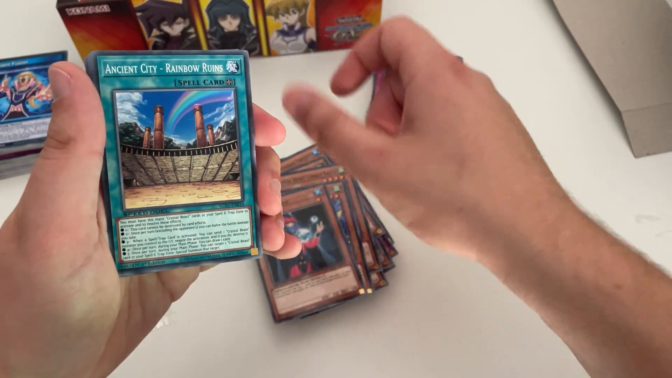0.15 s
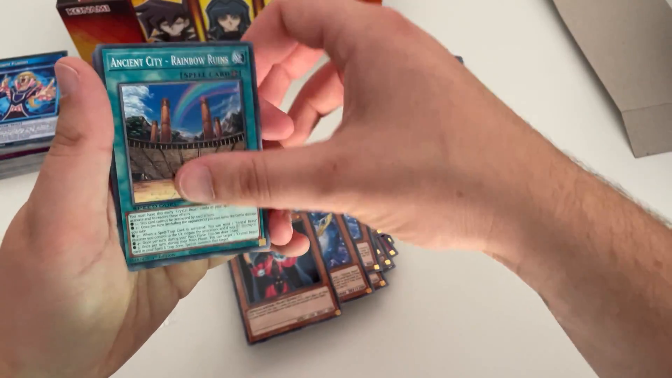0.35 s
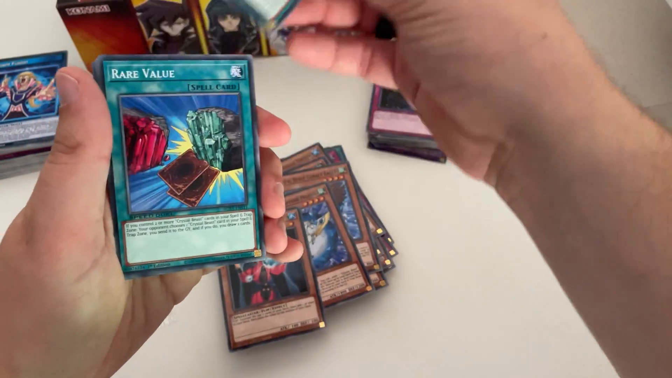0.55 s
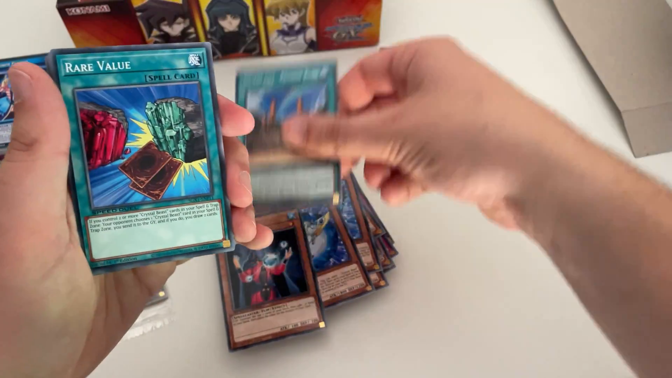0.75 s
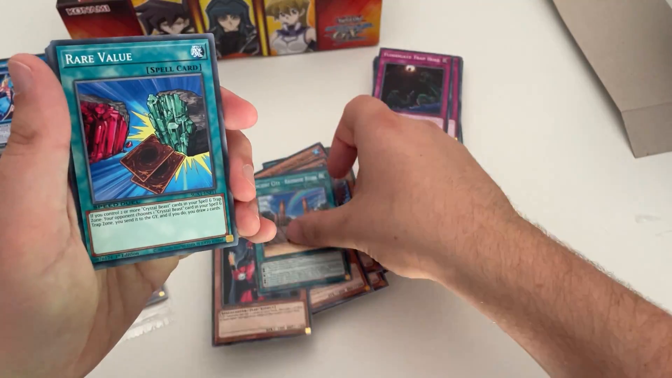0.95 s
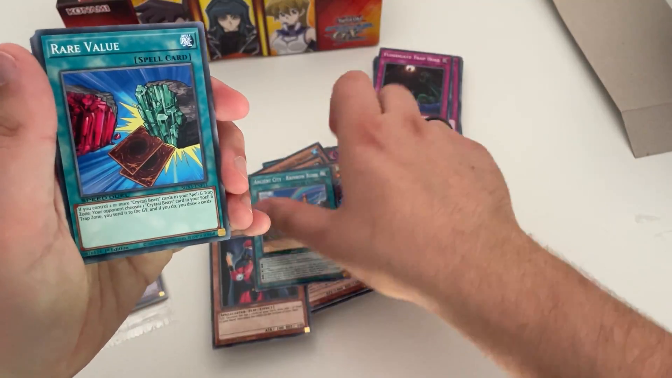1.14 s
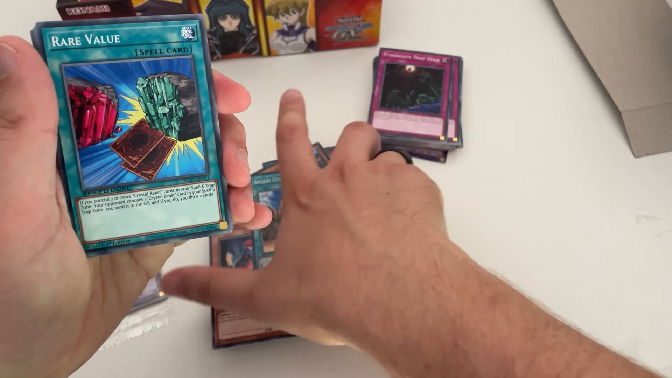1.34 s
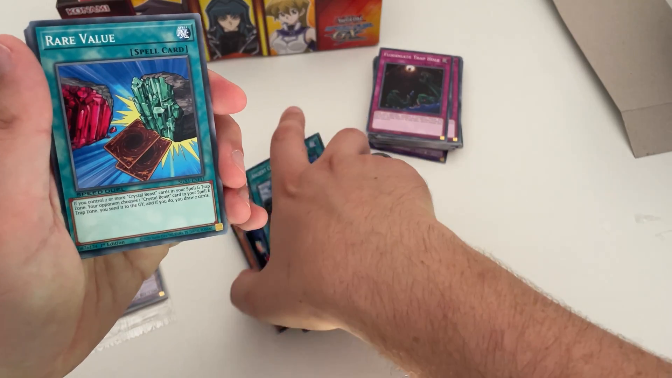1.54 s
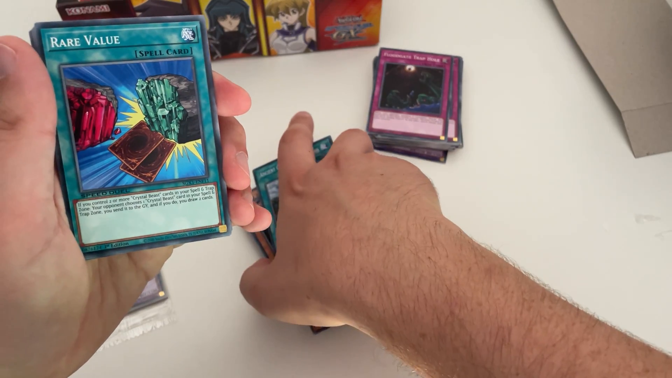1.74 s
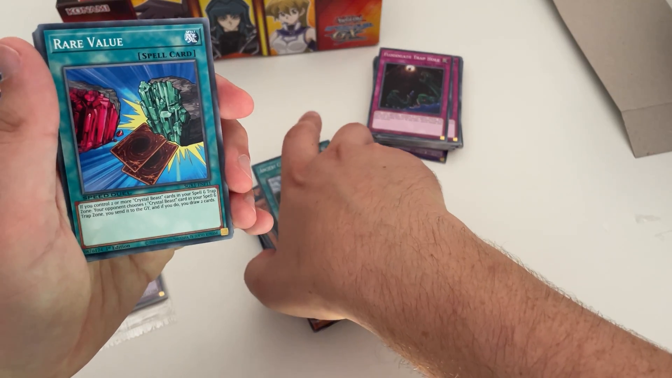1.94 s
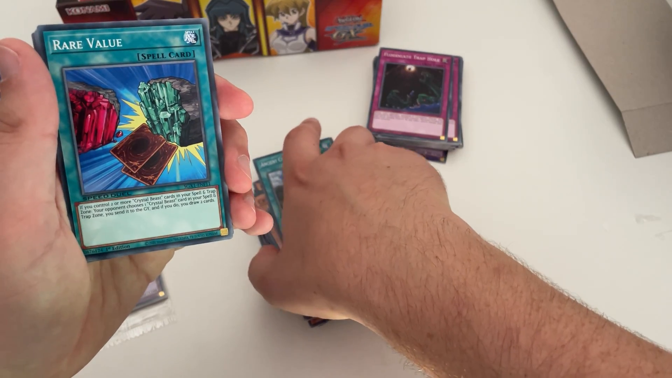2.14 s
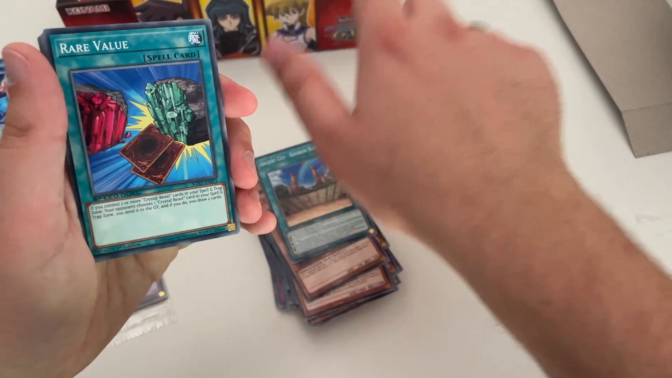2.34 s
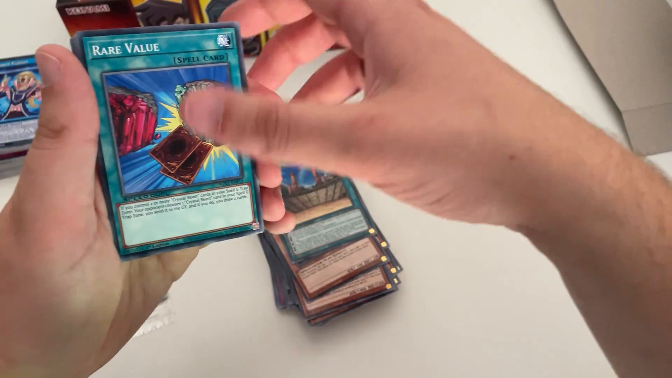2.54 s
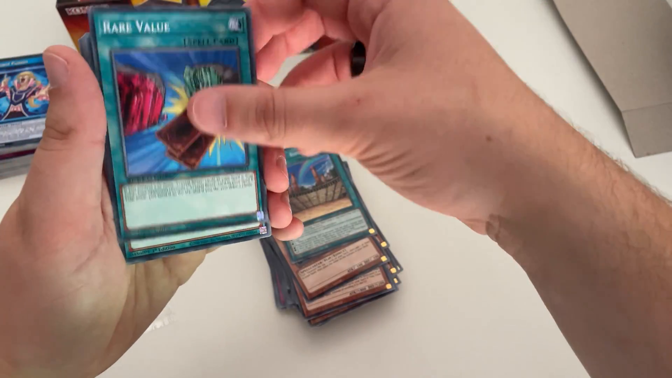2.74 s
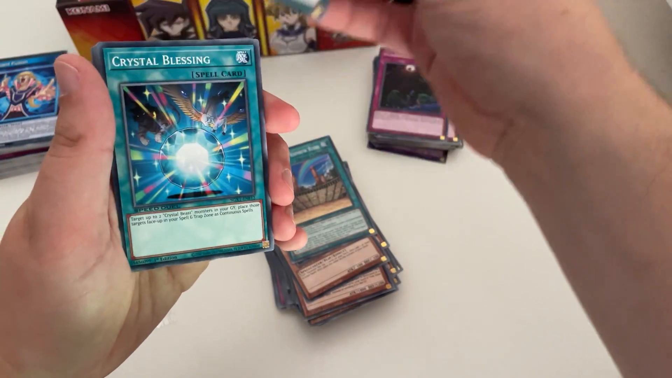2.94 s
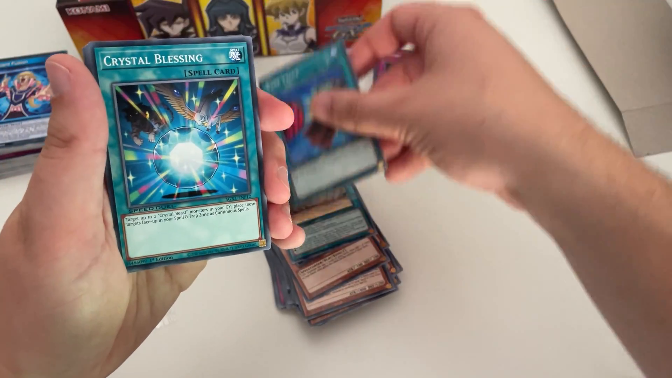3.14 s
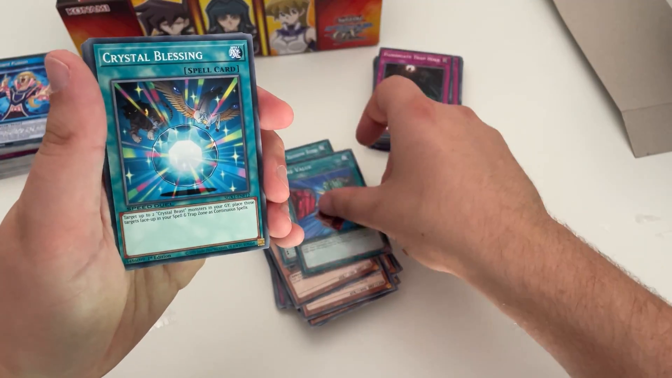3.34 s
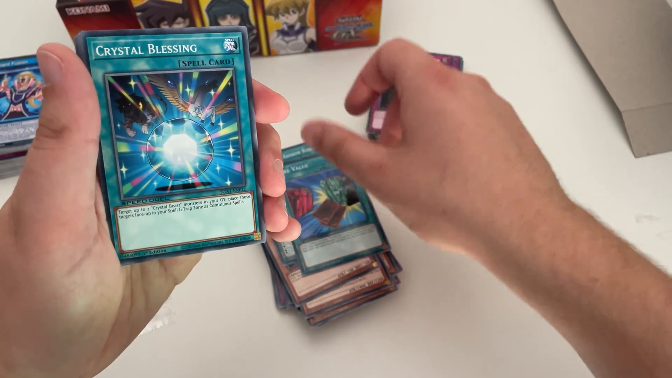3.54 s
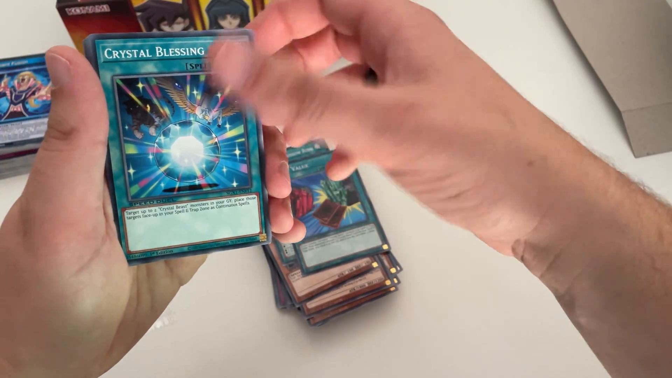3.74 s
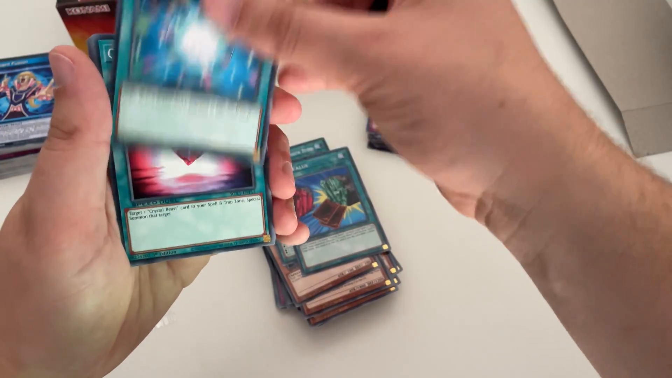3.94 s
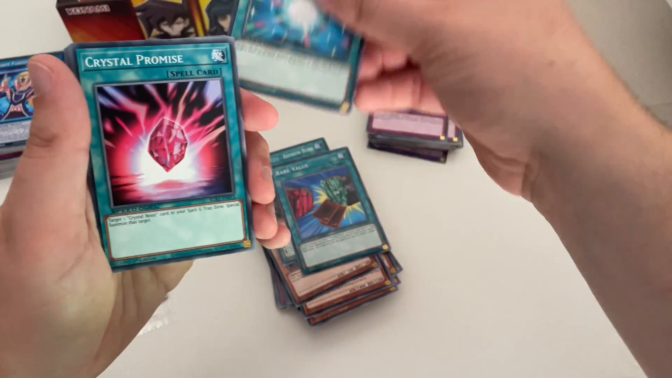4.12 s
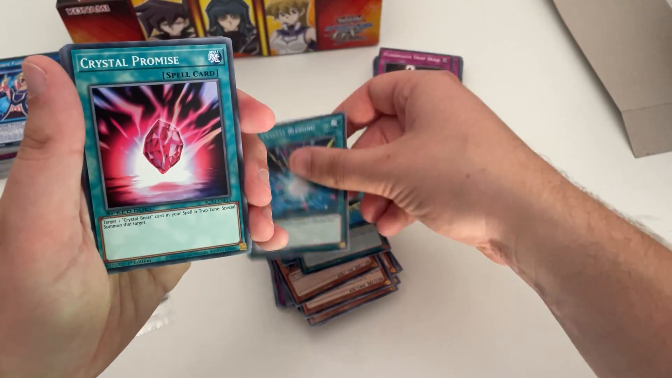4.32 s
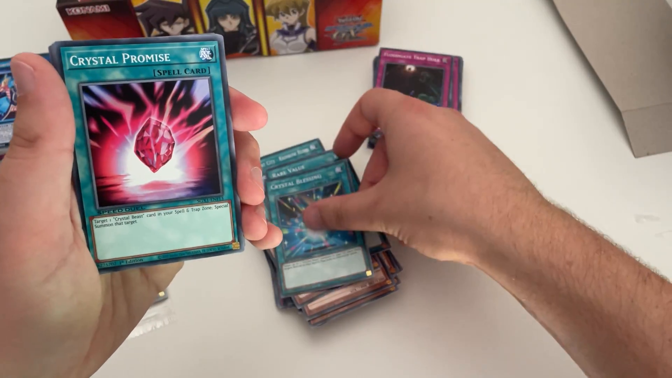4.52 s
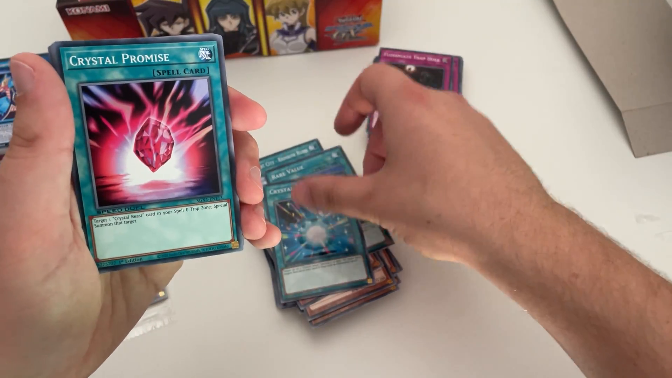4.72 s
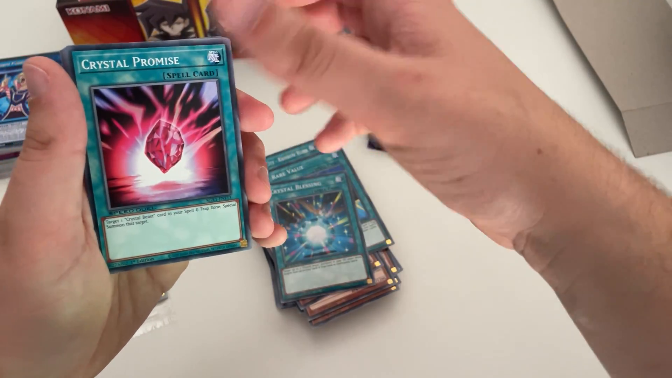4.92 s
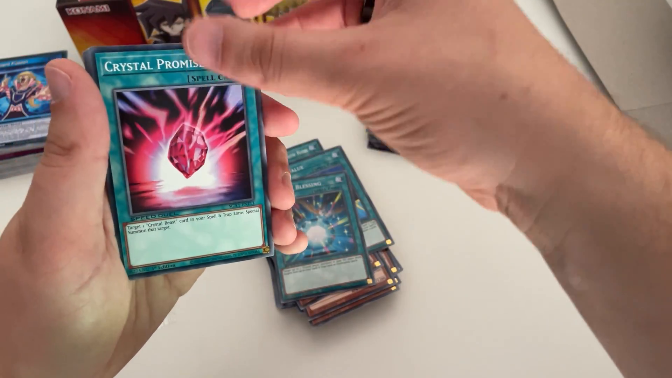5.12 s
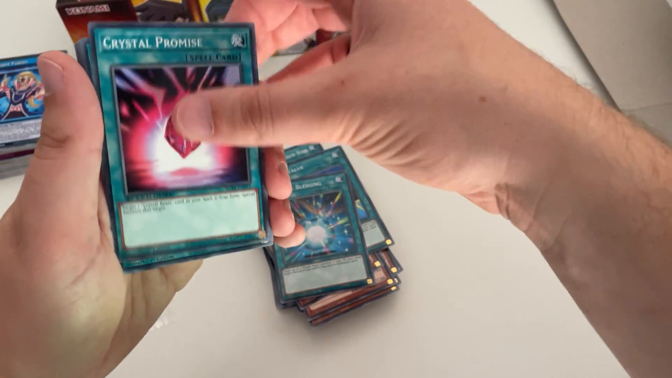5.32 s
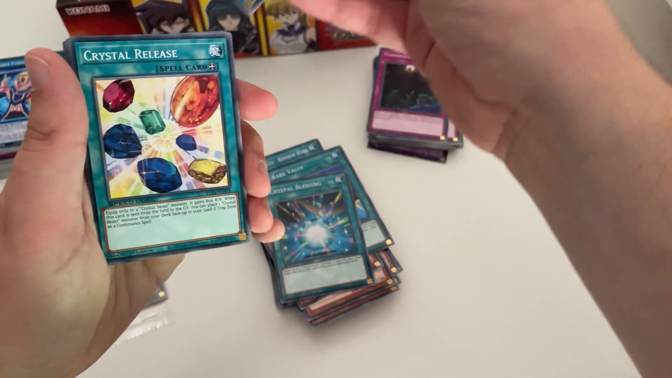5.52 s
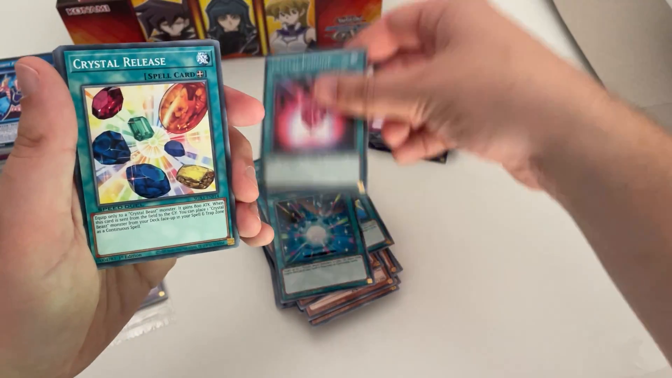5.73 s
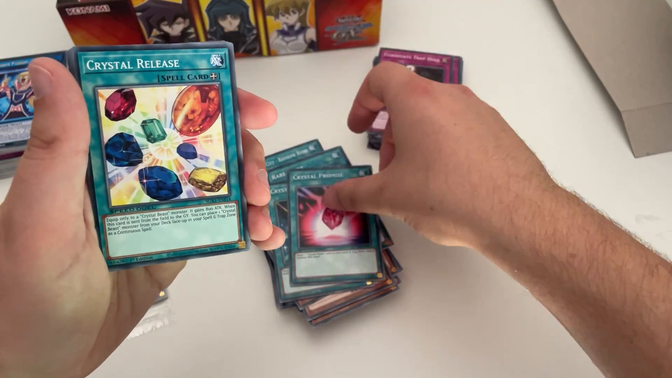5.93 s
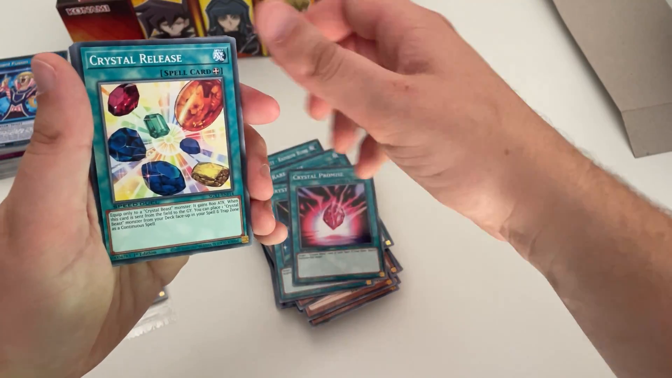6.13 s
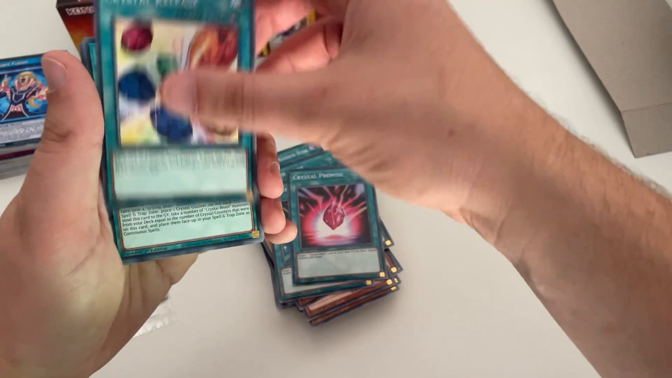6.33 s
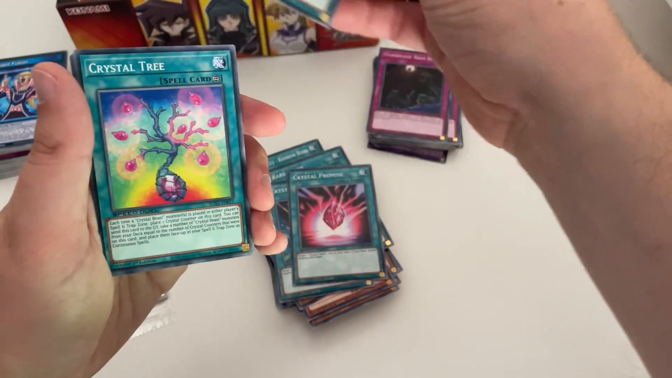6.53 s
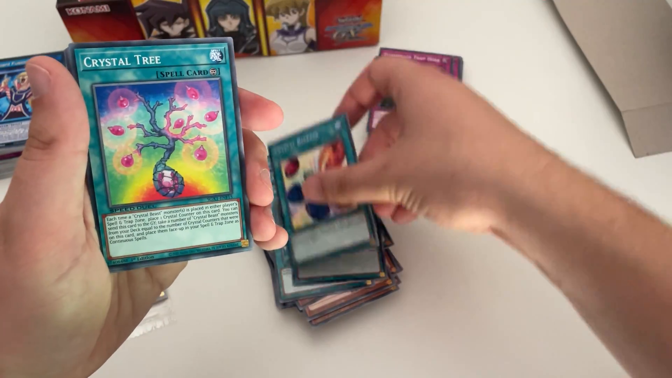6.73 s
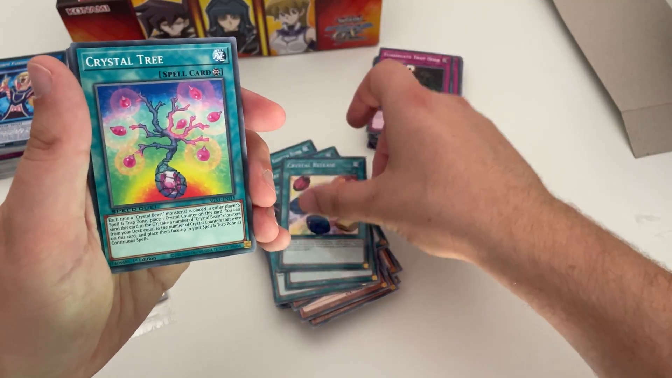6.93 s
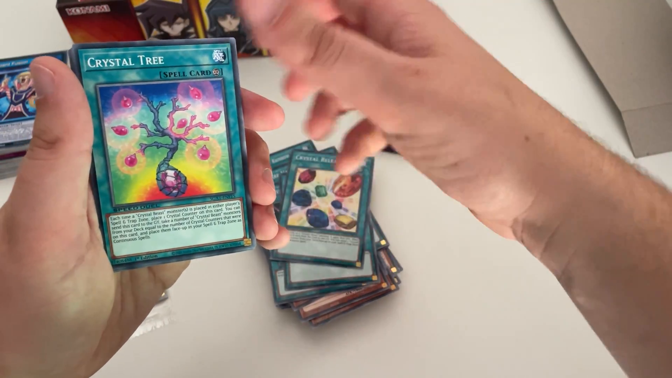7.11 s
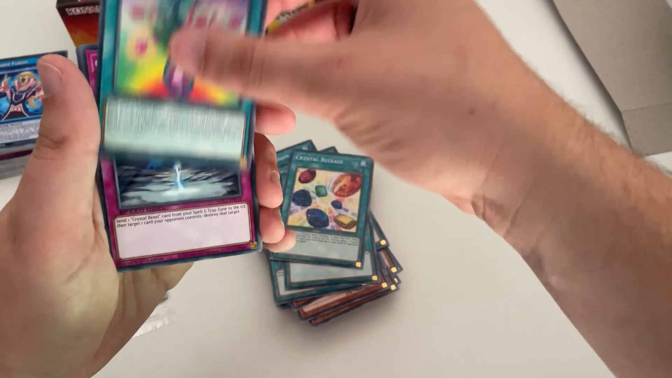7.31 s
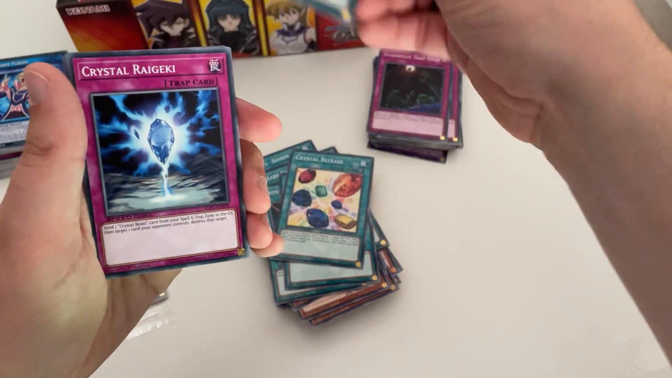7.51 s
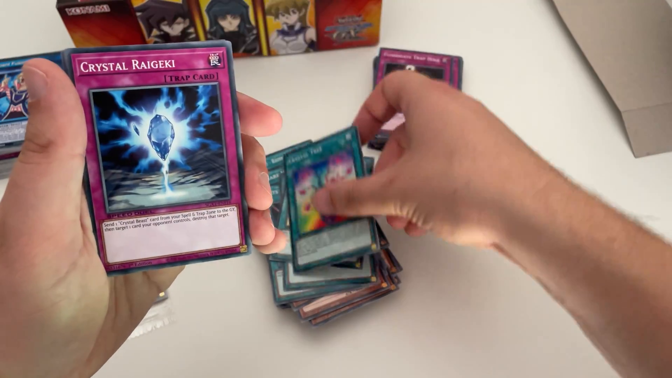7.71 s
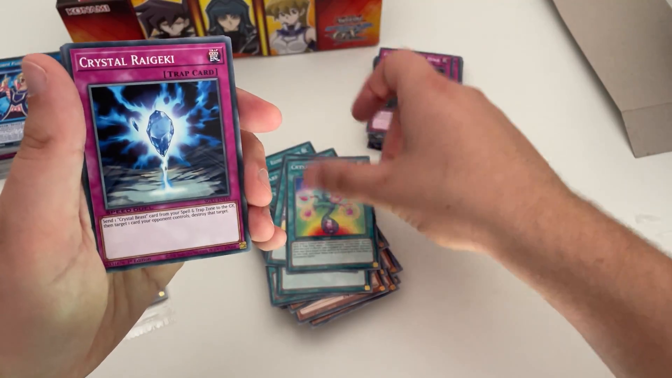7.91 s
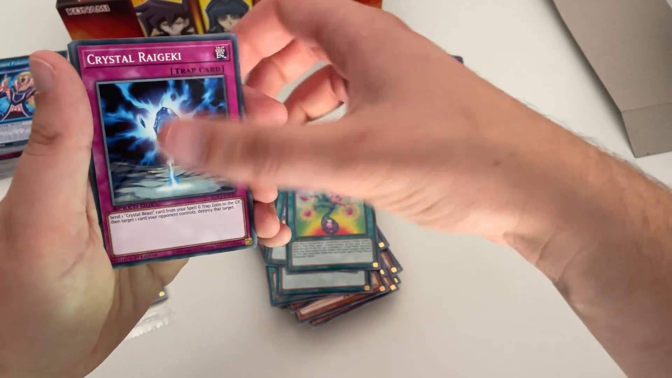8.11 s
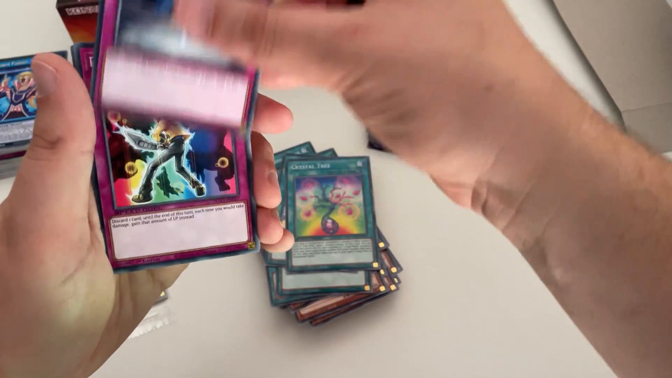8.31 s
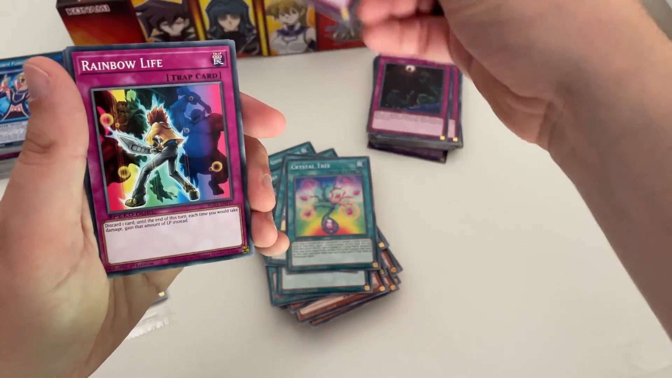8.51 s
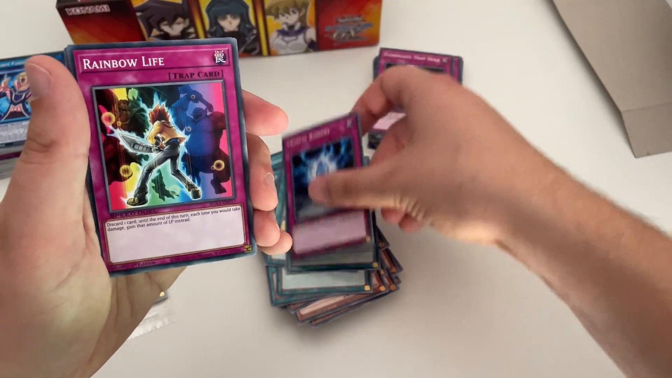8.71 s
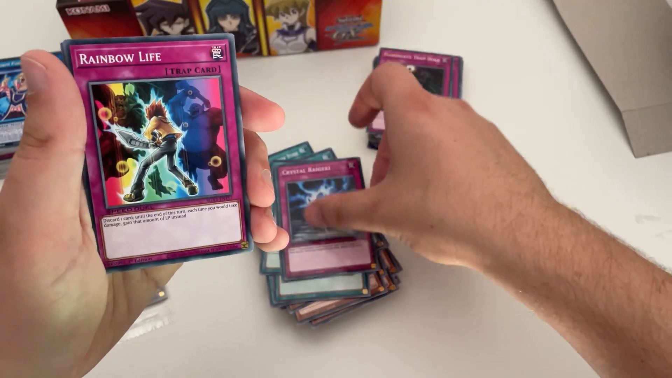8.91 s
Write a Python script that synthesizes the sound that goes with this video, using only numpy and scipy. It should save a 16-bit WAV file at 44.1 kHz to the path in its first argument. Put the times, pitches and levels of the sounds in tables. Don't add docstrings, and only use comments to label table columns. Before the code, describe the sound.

Very close stereo sound of thin coated cards being dealt in a small quiet room. A laid card rustles at the start, with a light tap at 0.36 s. At 0.5 s a card is whisked off the deck with a soft hiss, landing in taps and scuffs around 0.9 s. A quieter stretch follows, with small clicks and a short scrape near 1.5 s as the pile is squared up. Brisk pulls with springy snaps come at about 2.9, 4.0, 5.5, 6.4, 7.4 and 8.4 s, each preceded by a faint thumb grip or creep. Papery landings follow near 3.3, 4.2, 5.9, 6.8, 7.8 and 8.8 s; the one at 4.2 s is clearly the loudest, a sharp scraping slap. Soft low table thumps, faint finger rustles, low hum and street rumble continue underneath, with a distant engine drone faintly rising around 7.5 s.

```python
import sys
import numpy as np
from scipy import signal
from scipy.fft import rfft, irfft, next_fast_len
from scipy.io import wavfile
from scipy.ndimage import uniform_filter1d

SR = 44100
rng = np.random.default_rng(int(sys.argv[2]) if len(sys.argv) > 2 else 0)


def makeup_ratio(level_db):
    decades = np.asarray(level_db, float) / 20
    return 10 ** decades


def put_to_file(sound):
    columns = np.atleast_2d(sound).T
    safe = np.clip(columns, -1, 1)
    whole_steps = np.round(safe * 32767)
    wavfile.write(sys.argv[1], SR, whole_steps.astype(np.int16))


N = 395136

# hz [Hz], level_db [dB]
SHEEN_BANDS = [(6000, -36.5), (8000, 6.5), (10500, 0.5), (13000, -4.5), (16000, -5.5)]
# start_s [s], fastest_s [s], end_s [s], level_db [dB], brightness_db [dB]
PULL_STROKES = [(0.495, 0.544, .571, -45.5, -2), (2.876, 2.92, 2.936, -43.5, -1.5),
                (3.956, 3.981, 4.01, -47.5, 3.5), (5.443, 5.485, 5.497, -43.5, 1.5),
                (6.385, 6.411, 6.476, -46.5, -0.5), (7.389, 7.416, 7.43, -49.5, -4),
                (8.326, 8.345, 8.39, -46.5, -1)]


def unit(x):
    return x / np.sqrt(np.mean(x ** 2) + 1e-20)


def along(points, hz):
    f, v = np.transpose(points)
    return np.interp(np.log(hz + 1), np.log(f + 1), v)


def curves(rows):
    s, *cols = np.transpose(rows)
    return [np.interp(np.arange(N) / SR, s, c) for c in cols]


def wobble(rate):
    knots = rng.standard_normal(int(N * rate / SR) + 2)
    return np.interp(np.arange(N) * rate / SR, np.arange(len(knots)), knots)


def filtered(x, response):
    n = x.shape[-1]
    m = next_fast_len(n + 4096)
    return irfft(rfft(x, m) * response(np.fft.rfftfreq(m, 1 / SR)), m)[..., :n]


def mode(f, hz, width):
    return 1j * f * width / (hz * hz - f * f + 1j * f * width + 1e-9)


def noise(spectrum, grit_db=0):
    grain_db = grit_db * wobble(900) + 1.05 * grit_db * wobble(90)
    grit = makeup_ratio(np.minimum(grain_db, 4.5))
    return unit(filtered(grit * rng.standard_normal(N), lambda hz: makeup_ratio(along(spectrum, hz))))


def patchy(x, depth_db, size=256):
    z = signal.stft(x, nperseg=size)[2]
    field = uniform_filter1d(rng.standard_normal(z.shape), size=5, axis=0)
    field = uniform_filter1d(field, size=6, axis=1)
    return unit(signal.istft(z * makeup_ratio(depth_db * unit(field)), nperseg=size)[1][:N])


def card(f, trim_db=0):
    # hz [Hz], width_hz [Hz], level_db [dB]
    card_modes = [(1300, 1700, -7.5), (2020, 260, -2), (3200, 330, -10.5), (5700, 1600, -7.5)]
    trims = np.broadcast_to(trim_db, len(card_modes))
    total = 0
    for k, (hz, width, db) in enumerate(card_modes):
        total = total + (-1) ** k * makeup_ratio(db + trims[k]) * mode(f, hz, width)
    return total


def deck(f):
    # hz [Hz], width_hz [Hz], level_db [dB]
    deck_modes = [(2050, 350, 4), (3220, 380, 5), (5400, 1100, 4)]
    return 0.55 + sum(makeup_ratio(db - 7) * np.abs(mode(f, hz, width)) ** 2 for hz, width, db in deck_modes)


def strokes(rows, law, catch, slip):
    out = np.zeros((len(law), N))
    over_db, share, start_db, end_db = np.transpose(law)[..., None]
    for start, fastest, end, db, bright_db in rows:
        i = np.arange(max(0, round(start * SR)), min(N, round(end * SR)))
        before = np.clip((fastest - i / SR) / (fastest - start), 0, 1) ** catch
        after = np.clip((i / SR - fastest) / (end - fastest), 0, 1) ** slip
        out[:, i] += makeup_ratio(db + over_db + share * bright_db - start_db * before - end_db * after)
    return uniform_filter1d(out, size=351, axis=1)


def drawing_strokes():
    # start_s [s], fastest_s [s], end_s [s], level_db [dB], brightness_db [dB]
    pushes = [(.395, .49, 0.48, -59, 4), (1.45, 1.49, 1.58, -62, -14.5), (2.735, 2.86, 2.88, -59.5, 0),
              (3.86, 3.945, 4.16, -62.5, 1.5), (5.37, 5.43, 5.445, -60, 1), (6.3, 6.335, 6.39, -63, 7),
              (7.265, 7.31, 7.38, -59.5, 5), (8.215, 8.27, 8.43, -60.5, 2)]
    shoves = [(1.526, 1.575, 1.613, -51, 1.5)]
    # over_level_db [dB], brightness_share, start_drop_db [dB], end_drop_db [dB]
    push_law = [(-2, -0.14, 17, -1.5), (2.5, -0.064, 13, 0.5), (-19, -1.1, 37, -0.5), (-4.5, .8, 10.5, 5)]
    pull_law = [(-6.5, -1.5, 9.1, 2.5), (0.94, -0.6, 11, 10), (-21.5, -3, 6, -8), (-6, 0.26, 9, 18.5)]
    shove_law = [(-7, -.8, 18, 6.3), (-0.5, 0.73, 2, 1.4), (-11.5, -0.65, -5, 11), (-12, .8, 7, 4)]
    gains = strokes(pushes, push_law, catch=2.1, slip=1.2)
    gains = gains + strokes(PULL_STROKES, pull_law, catch=1.3, slip=1.3)
    return gains + strokes(shoves, shove_law, catch=1.2, slip=1.6)


def settling_strokes():
    # start_s [s], fastest_s [s], end_s [s], level_db [dB], brightness_db [dB]
    lies = [(-.02, .002, 0.15, -49.5, 4), (.87, .954, 1.23, -58.5, -3.5), (1.61, 1.63, 1.77, -63, 4),
            (3.3, 3.4, 3.54, -54.5, -2), (4.205, 4.27, 4.47, -46.5, -2.5), (4.42, 4.51, 4.69, -57, 3.5),
            (5.84, 5.95, 6.05, -58.5, 4), (6.77, 6.9, 7.0, -63, -4), (7.73, 7.85, 7.95, -59.5, 0.5),
            (8.745, 8.82, 9.1, -56, 1), (8.89, 8.93, 9.8, -70, -1)]
    fumbles = [(.12, .21, 0.67, -77.5, -6.5), (.575, .6, 0.85, -73, -1), (.75, .8, 1.1, -71, 0.5),
               (1.76, 1.8, 1.88, -69.5, -1), (1.9, 1.98, 2.1, -77, 3), (2.95, 2.975, 3.5, -69, 1),
               (4.02, 4.04, 4.13, -71, -7), (5.55, 5.63, 5.68, -66.5, 2.5), (5.74, 5.77, 5.8, -69.5, -2.5),
               (6.49, 6.52, 6.6, -66.5, 1.5), (6.6, 6.65, 6.72, -75, -5.5), (7.44, 7.46, 7.52, -69.5, 4.5),
               (7.52, 7.57, 7.65, -63.5, -1), (8.41, 8.43, 8.57, -78.5, 9), (8.51, 8.54, 8.58, -67, -1.5),
               (8.65, 8.69, 8.72, -73, -6)]
    # over_level_db [dB], brightness_share, start_drop_db [dB], end_drop_db [dB]
    lie_law = [(0, .1, 4, 19), (1, -1.4, 22, 25), (-24.5, 1.6, 6, 28)]
    fumble_law = [(-0.5, 0.35, 13, 21), (-2.5, -2, 17, 42), (-10.5, 2, 9, 14)]
    return strokes(lies, lie_law, catch=1.2, slip=0.71) + strokes(fumbles, fumble_law, catch=1.1, slip=0.8)


def glide(x):
    # start_hz [Hz], end_hz [Hz]
    end_rings = [(5600, 3200), (4500, 4900), (5300, 4300), (6200, 2900), (5600, 2900), (4500, 2500),
                 (5800, 2600)]
    height_db, width_octaves = 4.5, 0.51
    hz, t, z = signal.stft(x, SR, nperseg=256)
    for (start, _, end, _, _), (start_hz, end_hz) in zip(PULL_STROKES, end_rings):
        now = (t > start) & (t < end)
        ring_hz = start_hz * (end_hz / start_hz) ** ((t[now] - start) / (end - start))
        octaves = np.log2((hz[:, None] + 1) / ring_hz)
        z[:, now] *= makeup_ratio(height_db * (np.exp(-(octaves / width_octaves) ** 2) - 0.5))
    return signal.istft(z, SR, nperseg=256)[1][:N]


def slide():
    # hz [Hz], level_db [dB]
    rasp_bands = [(500, -30), (1100, -3.5), (2100, 2), (3200, 1.5), (4200, -39.5)]
    # hz [Hz], level_db [dB]
    hiss_bands = [(2800, -10), (3800, -2.5), (5500, -4), (6800, 0.5), (8500, -11.5)]
    # hz [Hz], level_db [dB]
    body_bands = [(120, -25), (300, 7), (700, 5.5), (1200, 4.5), (1800, -43.5)]
    rasp_gain, hiss_gain, body_gain, sheen_gain = drawing_strokes()
    rustle_gain, rustle_body, rustle_sheen = settling_strokes()
    rasp = noise(rasp_bands, grit_db=2.0)
    rasp = patchy(rasp + 0.22 * filtered(rasp, card), depth_db=1.7)
    hiss = patchy(noise(hiss_bands, grit_db=2.0), depth_db=2.5)
    upper = makeup_ratio(-0.5) * (rasp_gain + 0.85 * rustle_gain) * rasp
    upper += (hiss_gain + 0.59 * rustle_gain) * hiss
    body = makeup_ratio(-2.5) * (body_gain + rustle_body) * noise(body_bands, grit_db=-1.0)
    sheen = makeup_ratio(4.5) * (sheen_gain + rustle_sheen) * noise(SHEEN_BANDS, grit_db=1.5)
    return makeup_ratio(1.8 * wobble(250)) * (glide(filtered(upper, deck)) + body + sheen)


def flicks():
    # start_s [s], peak_db [dB], pitch_hz [Hz] (the twang settles at 0.687 of
    # it), t60_s [s]
    twangs = [(0.567, -41.5, 170, 0.088), (2.959, -26.5, 280, 0.048), (4.0195, -31, 240, 0.063),
              (4.067, -41, 310, 0.062), (4.149, -41.5, 425, 0.053), (5.533, -35.5, 321, 0.081),
              (6.478, -40, 165, 0.042), (7.4425, -32, 209.5, 0.047), (8.396, -38, 271, 0.06)]
    out, t = np.zeros(N + SR), np.arange(SR // 8) / SR
    for s, db, end_hz, t60 in twangs:
        pitch = end_hz * (0.687 + 0.5 * np.exp(-t / 0.013)) + 2200 * np.exp(-t / 0.00075)
        level = makeup_ratio(db - 60 * t / t60) * (1 - np.exp(-t / 0.0036))
        out[round(s * SR):][:len(t)] += level * np.sin(2 * np.pi * np.cumsum(pitch) / SR)
    return out[:N]


def peak(x):
    return x / np.abs(x).max()


def contacts(rows, t60, rise, spike, favour, spread):
    out, t = np.zeros(N + SR), (np.arange(3000) - 800) / SR
    shape = np.where(t < 0, np.exp(t / rise), makeup_ratio(-60 * np.abs(t) / np.clip(t60, 0.003, 0.1)))

    def bend(f):
        return np.exp(-4j * np.pi * spread * np.sqrt(f))

    for s, db, thud_db, sheen_db, hz in rows:
        burst = shape * rng.standard_normal((3, len(t))) + spike * (t == 0)
        trim_db = 2.0 * rng.standard_normal(4)

        def struck_card(f):
            return (card(f, trim_db) + 0.08 * mode(f, 3000, 5000)) * (1 + favour * mode(f, hz, 0.3 * hz))

        ring = filtered(burst[0], struck_card)
        thud = filtered(burst[1], lambda f: 0.8 * mode(f, 250, 350) - 0.98 * mode(f, 774, 500))
        sheen = filtered(burst[2], lambda f: makeup_ratio(along(SHEEN_BANDS, f)))
        hit = makeup_ratio(-2.5) * peak(ring) + makeup_ratio(thud_db + 1) * peak(thud) + makeup_ratio(sheen_db + 4.5) * peak(sheen)
        out[round(s * SR) - 800:][:len(t)] += makeup_ratio(db) * filtered(hit, bend)
    return out[:N]


def taps():
    # peak_s [s], peak_db [dB], thud_db [dB], sheen_db [dB], favoured_hz [Hz]
    edge_hits = [(0.3557, -38, -16, -11, 5170), (0.8691, -31, -19, -14, 5000),
                 (1.4929, -33.5, -14, -7.5, 3080), (1.5325, -38, -21, -21, 3290),
                 (3.265, -29.5, -18, -6.5, 1940), (3.369, -24, -16, -14, 2580),
                 (4.4272, -37, -10, -22, 1600), (5.8367, -27.5, -28.5, -5, 1600),
                 (5.8543, -28, -12.5, -9.5, 3090), (5.916, -32, -18, -8, 4975),
                 (5.9265, -33.5, -28, -4, 5800), (6.7629, -28.5, -14.5, -11, 2200),
                 (6.8867, -29.5, -24.5, -12, 1300), (7.7264, -28.5, -20, -8.5, 3200),
                 (7.7353, -36.5, -7.5, -18, 2002), (7.8204, -26, -13, -6, 5485),
                 (8.745, -27.5, -21, -19, 2020), (8.8875, -34, -17, -5, 6100),
                 (8.9009, -38.5, -13, 2.5, 5700)]
    return contacts(edge_hits, t60=0.027, rise=0.000041, spike=8.5, favour=1.9, spread=0.015)


def scuffs():
    # peak_s [s], peak_db [dB], thud_db [dB], sheen_db [dB], favoured_hz [Hz]
    scrapes = [(0.6361, -46, 0.5, -4, 900), (0.9163, -32.5, -21, -7, 2010),
               (0.9565, -26.5, -18.5, -7.5, 1900), (2.9435, -31.5, -8, -20, 2000),
               (3.3179, -24, -32, -28.5, 3200), (3.3645, -27, -25, -3, 2330), (4.0685, -40, -4, -28, 1215),
               (4.2285, -10, -29, -23, 2600), (4.2625, -16, -26, -14, 1300),
               (4.2787, -20, -16, -14.5, 1630), (4.522, -38, -12, -27, 2040),
               (4.6178, -29.5, -33, -6, 5230), (5.6502, -43.5, -5.5, -12.5, 1770),
               (5.893, -27, -24, -13.5, 5250), (6.8185, -33, -20, -15.5, 1330),
               (7.8076, -28.5, -28, -17, 2020), (8.3978, -32, -6, -39, 3270), (8.8195, -38, -15, -20, 3200)]
    return contacts(scrapes, t60=0.022, rise=0.0032, spike=4.5, favour=1.8, spread=0.07)


def snaps():
    # peak_s [s], peak_db [dB], thud_db [dB], sheen_db [dB], favoured_hz [Hz]
    releases = [(5.5325, -32, -15, -15, 3000), (2.9581, -26, -18, -15.5, 1200),
                (4.0172, -25, -19, -19, 1100), (4.1501, -45.5, -2.5, -15.5, 3240),
                (6.5064, -43.5, -13, -26, 3020), (7.436, -27, -28, -14, 3070),
                (7.4727, -49.5, -3, -6, 4270), (6.558, -49, -12.5, -20, 3100),
                (7.565, -56, -8, -27.5, 1500), (8.4039, -34, -10.5, -8, 3400)]
    return contacts(releases, t60=0.027, rise=0.0005, spike=5.9, favour=2.8, spread=0.035)


def grips():
    # peak_s [s], peak_db [dB], sheen_db [dB]
    landings = [(2.618, -46, 0), (3.831, -40.5, -8.5), (5.08, -51, -1.5), (5.1163, -55.5, 8.5),
                (5.3, -43.5, -4), (6.277, -42, -1.5), (7.247, -37.5, -5), (8.1866, -38, -4)]
    thud_db, spot_hz = -12.5, 2028
    rows = [(s, db, thud_db, sheen_db, spot_hz) for s, db, sheen_db in landings]
    return contacts(rows, t60=0.0114, rise=0.00036, spike=10.5, favour=7.6, spread=0.015)


def catches():
    # peak_s [s], peak_db [dB], pitch_hz [Hz]
    knocks = [(.484, -51.5, 800), (.563, -45, 1800), (.895, -44, 1950), (.922, -37, 2000),
              (.929, -37, 2010), (0.9578, -27.5, 5270), (.97, -40, 5700), (2.914, -37.5, 5200),
              (2.928, -36.5, 5400), (3.317, -28.5, 5300), (3.36, -36, 1220), (3.368, -28.5, 5300),
              (3.375, -41.5, 398), (3.975, -38.5, 5000), (4.003, -43, 3600), (4.229, -18, 5200),
              (4.2297, -15, 850), (4.23, -24.5, 450), (4.2615, -17, 5300), (4.2635, -21.5, 418),
              (4.2635, -17.5, 780), (4.272, -29, 5700), (4.28, -21.5, 5150), (4.283, -31.5, 348),
              (4.289, -35.5, 5800), (4.296, -37, 380), (4.304, -35, 3000), (4.306, -38, 450),
              (4.618, -29.5, 5300), (4.325, -41, 300), (5.447, -44, 5600), (5.467, -39.5, 5800),
              (5.522, -45, 3400), (5.557, -51, 2000), (6.39, -46, 1800), (6.449, -38, 5300),
              (6.467, -42.5, 1150), (6.487, -52, 2000), (6.812, -39, 2010), (6.819, -40.5, 3200),
              (6.888, -33, 5870), (6.899, -44, 5700), (7.42, -41, 1550), (7.776, -49, 3350),
              (7.821, -31.5, 1270), (8.331, -36, 5600), (8.345, -36, 5400), (8.392, -40, 2515),
              (1.603, -44, 5400), (2.618, -50, 5600), (3.831, -48, 5600), (4.427, -42, 3000),
              (7.442, -40, 330), (8.189, -44, 260), (8.687, -51, 1000), (8.812, -41, 1900),
              (8.828, -41, 1500), (8.889, -31, 5800), (8.889, -37, 1300)]
    rise_s, t60_s, width = 0.001, 0.018, 0.35
    out, t = np.zeros(N + SR), (np.arange(2000) - 400) / SR
    shape = np.where(t < 0, np.exp(t / rise_s), makeup_ratio(-60 * np.abs(t) / t60_s))
    for s, db, hz in knocks:
        puff = shape * rng.standard_normal(len(t))
        ring = filtered(puff, lambda f: mode(f, hz, width * hz) * mode(f, hz, 2 * width * hz))
        out[round(s * SR) - 400:][:len(t)] += makeup_ratio(db) * peak(ring)
    return out[:N]


def thumps():
    # start_s [s], peak_db [dB], pitch_hz [Hz]
    jolts = [(0.364, -52.5, 88), (2.057, -54, 54.7), (2.957, -44, 105), (3.362, -46, 89.5),
             (3.831, -49.5, 76.4), (4.26, -41.5, 105.5), (5.309, -50, 80.5), (5.537, -49, 105.6),
             (5.843, -51, 67), (6.285, -50, 82.7), (6.478, -47.5, 102), (7.25, -46.5, 64.4),
             (8.19, -47.5, 95), (8.395, -49.5, 112.4)]
    out, t = np.zeros(N + SR), np.arange(SR // 8) / SR
    for s, db, hz in jolts:
        level = makeup_ratio(db + 4 - 60 * t / 0.17) * (1 - np.exp(-t / 0.00078))
        out[round(s * SR):][:len(t)] += level * np.sin(2 * np.pi * hz * t)
    return out[:N]


def room(x):
    # hz [Hz], t60_s [s]
    decay = [(200, 0.26), (600, 0.31), (2000, 0.35), (6000, 0.38), (12000, 0.29)]
    wet, step = np.zeros((2, N + 2 * SR)), SR // 3
    for start in range(0, N, step):
        hz, t, z = signal.stft(rng.standard_normal((2, SR // 2)), SR, nperseg=256)
        tail = signal.istft(z * makeup_ratio(-60 * t / along(decay, hz)[:, None]), SR, nperseg=256)[1]
        tail = tail / np.linalg.norm(tail[0])
        answer = signal.fftconvolve(x[None, start:start + step], tail, axes=1)
        wet[:, start + 150:][:, :answer.shape[1]] += answer
    return wet[:, :N]


def still_air():
    # hz [Hz], level_db [dB]
    air_mid = [(250, -30), (420, -0.5), (700, -3.5), (1500, -0.5), (2700, 0), (3300, 3), (4000, -2.5),
               (5500, -4.5), (7000, 0), (10000, -25), (16000, -26)]
    # hz [Hz], level_db [dB]
    air_side = [(24, -45), (40, -13), (103, -6.5), (248, -10.5), (312, -5.5), (678, -13.5), (890, -11.5),
                (2060, -24.5), (3270, -11.5), (6000, -30.5), (7800, -65), (13200, -120)]
    air_db = -74
    shared = makeup_ratio(air_db + 0.64 * wobble(3.6)) * patchy(noise(air_mid), depth_db=1.5, size=512)
    return shared, makeup_ratio(air_db) * noise(air_side)


def street():
    # time_s [s], level_db [dB]
    swells = [(0.0, -67.5), (2.07, -74), (3.94, -71.5), (4.26, -61.5), (4.67, -74.5), (6.3, -70.5),
              (7.19, -73), (7.36, -66), (7.91, -70), (8.71, -71.5), (8.96, -65.5)]
    rumble_db, = curves(swells)
    deep = noise([(22, -60.0), (35, -8), (50, 20.5), (75, 16.5), (95, -48.5)])
    rumble = makeup_ratio(rumble_db + 5 + 2 * wobble(5)) * deep
    murmur = noise([(100, -26.5), (135, 6), (220, -5.5), (345, -4.5), (480, -15.5), (800, -36)])
    murmur_db = -73.0 + 1.6 * (rumble_db + 72.0) + 1.8 * wobble(6.8)
    return rumble + makeup_ratio(murmur_db) * patchy(murmur, depth_db=3, size=2048)


def mains_hum():
    return makeup_ratio(-68.5) * noise([(85, -19.0), (96, 10), (100, 0.5), (104, 11), (120, -49)])


def far_engine():
    # time_s [s], pitch_hz [Hz], level_db [dB]
    drone = [(6.4, 129.8, -75), (6.7, 131.7, -71.5), (7.05, 138, -77), (7.2, 144, -66.5),
             (7.48, 153.4, -57), (7.7, 150.7, -81), (8.25, 146, -75), (8.5, 142.6, -82), (8.96, 135.2, -66)]
    drone_hz, drone_db = curves(drone)
    drone_db = drone_db - 60 * (np.arange(N) < drone[0][0] * SR)
    level = makeup_ratio(drone_db + 8.0 + 2.6 * wobble(14))
    return level * np.sin(2 * np.pi * np.cumsum(drone_hz + 1.2 * wobble(24)) / SR)


def scene():
    # hz [Hz], level_db [dB]
    apart_bands = [(60, -28.5), (200, -15), (500, 0), (1300, -2), (3000, -1), (5500, -6), (6500, -58.5)]
    cards = slide() + flicks() + taps() + scuffs() + snaps() + grips() + catches()
    shared, apart = makeup_ratio(-11.5) * room(cards)
    air, air_apart = still_air()
    mid = cards + thumps() + shared + air + street() + mains_hum() + far_engine()
    side = filtered(apart, lambda hz: makeup_ratio(along(apart_bands, hz))) + air_apart
    return np.array([mid + side, mid - side])


def top_cut(x):
    return signal.sosfilt(signal.butter(12, 16500, fs=SR, output="sos"), x)


def record(dry):
    # hz [Hz], lead [radians]
    left_lead = [(0, 0), (2000, .1), (2900, .9), (4500, .8), (5200, .3), (7100, 2.8), (8200, 3.5),
                 (10700, 6), (11600, 6.6), (13500, 9), (14900, 9.8), (16500, 11.6)]
    # hz [Hz], level_db [dB]
    left_tilt = [(120, 0), (500, 1.3), (1000, -.4), (2000, -1.4), (4000, -.4), (6500, 0)]

    def ports(hz):
        lead = np.interp(hz, *np.transpose(left_lead))
        level = makeup_ratio(np.outer([0.5, -0.5], along(left_tilt, hz)))
        return (hz < 15950) * level * np.exp(0.5j * np.outer([1, -1], lead))

    mix = filtered(dry, ports)
    return top_cut(mix)


dry = scene()
out = record(dry)
put_to_file(out)
```